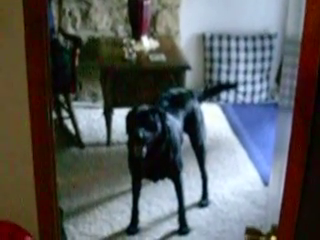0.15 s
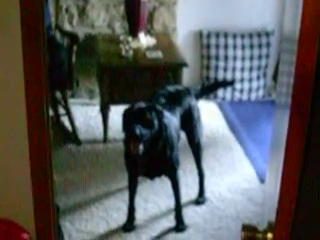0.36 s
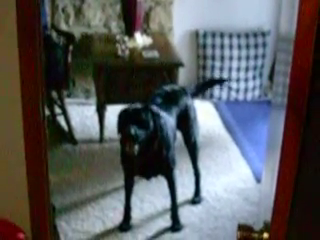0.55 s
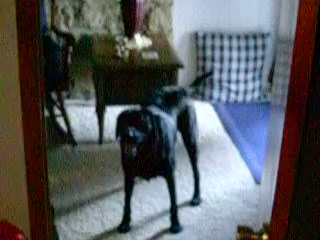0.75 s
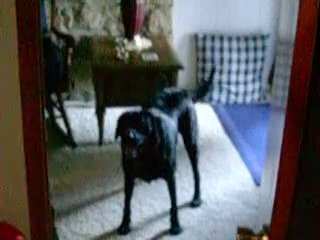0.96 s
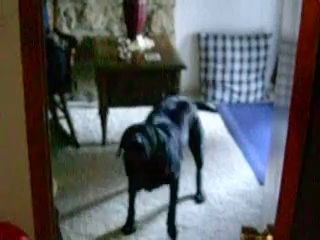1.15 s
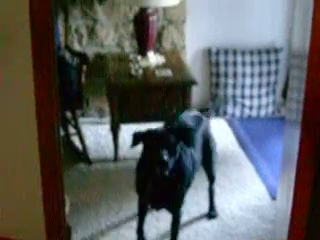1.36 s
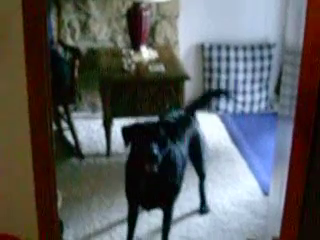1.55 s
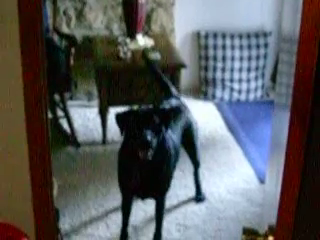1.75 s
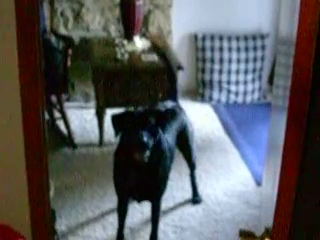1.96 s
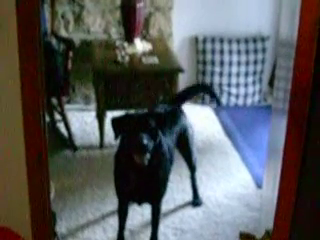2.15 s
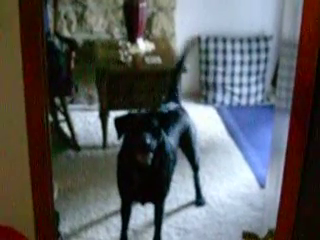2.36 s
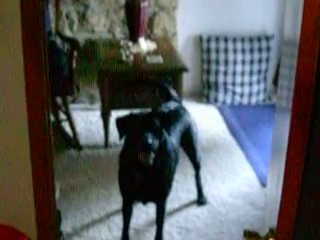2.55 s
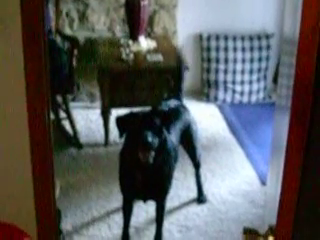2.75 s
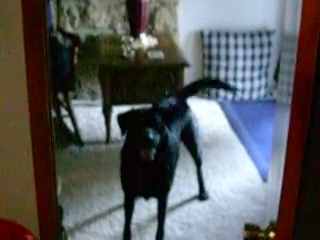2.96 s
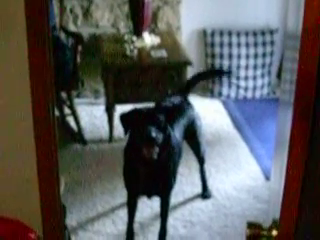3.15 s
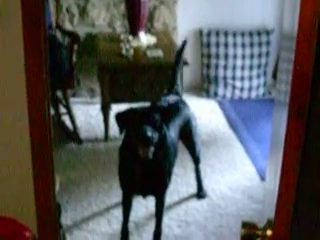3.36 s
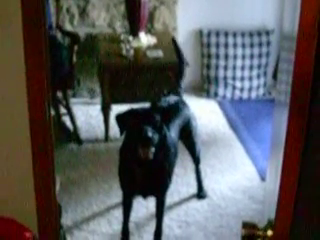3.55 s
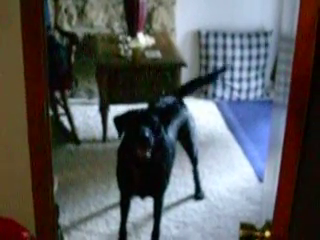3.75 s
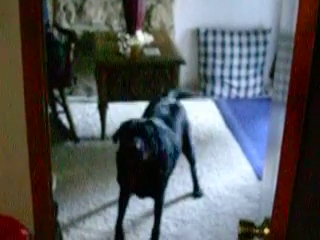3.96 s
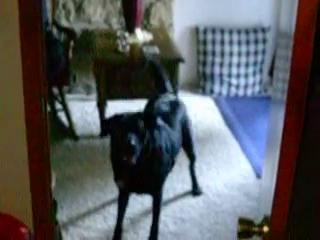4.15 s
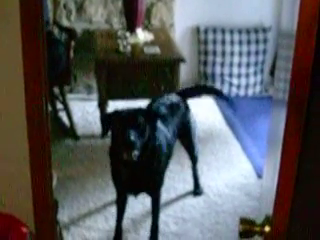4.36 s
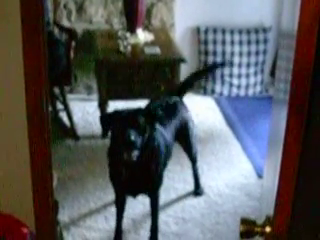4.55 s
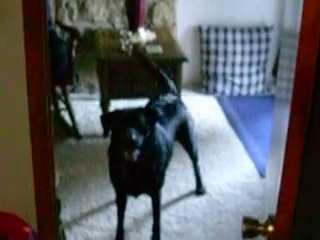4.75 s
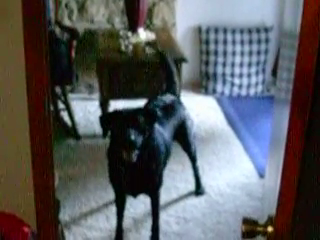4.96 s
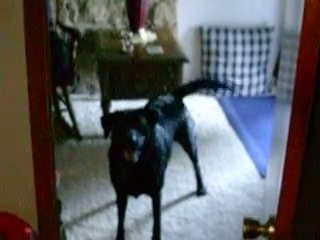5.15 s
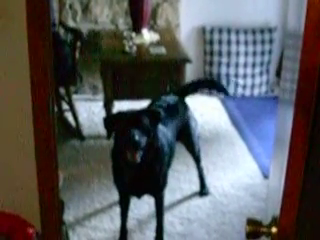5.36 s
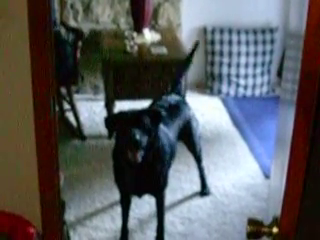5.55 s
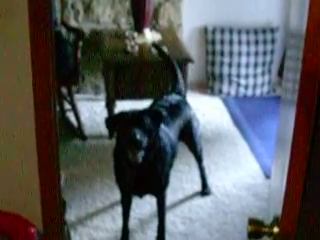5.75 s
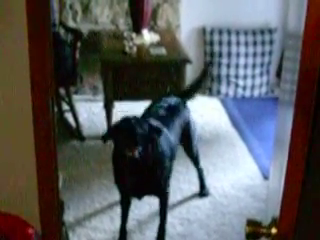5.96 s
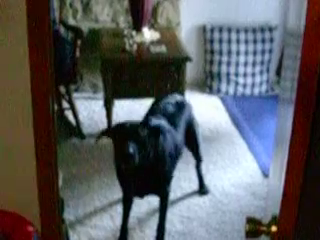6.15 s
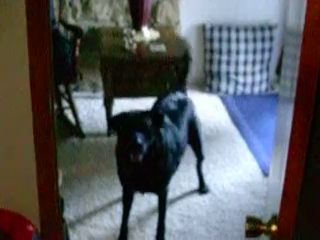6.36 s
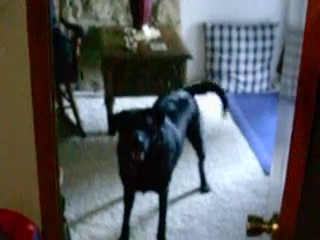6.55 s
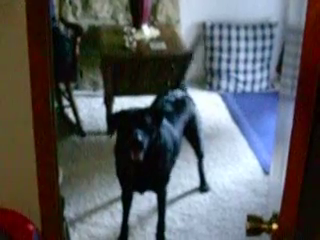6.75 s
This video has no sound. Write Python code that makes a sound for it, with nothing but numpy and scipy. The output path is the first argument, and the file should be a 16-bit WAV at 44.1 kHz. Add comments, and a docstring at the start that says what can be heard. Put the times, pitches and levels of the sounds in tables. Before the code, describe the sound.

A large dog barks three times in a carpeted living room, each bark short, hoarse and loud, with two to three seconds between them. A steady low hum runs underneath. After the first bark come a small dull knock and a bright tick, then a couple of fainter ticks and very soft huffs. The small camera microphone sounds muffled and overloads briefly as each bark starts.

```python
"""Over a low, steady hum, a large dog gives three single, hoarse barks in a carpeted living room.
Each bark is one push of air that shakes the vocal folds, swoops up in pitch and falls back.
Faint huffs, light ticks and a small double knock lie between the barks.
A small camera picks it all up: it loses the treble, overloads as each bark starts,
then turns itself down and creeps back up."""
import sys
import numpy as np
from scipy import signal
from scipy.fft import rfft, irfft
from scipy.io import wavfile
from scipy.ndimage import uniform_filter1d

SR = 44100
rng = np.random.default_rng(int(sys.argv[2]) if len(sys.argv) > 2 else 0)


def inscribe(sig):
    """Save sig as 16-bit PCM at rate SR to the path in sys.argv[1].

    A 1-D sig is mono; a 2-D sig holds one channel per row.
    Samples are clipped to [-1, 1] before scaling.
    """
    pcm = np.round(np.clip(np.atleast_2d(sig).T, -1, 1) * 32767)
    wavfile.write(sys.argv[1], SR, pcm.astype(np.int16))


N = 298865
TIME = np.arange(N) / SR

# The three barks: (start [s], attack [s], length of the push [s], pitch it climbs toward [Hz],
# level [dB], roughness [0-1], widest mouth opening [0-1], lip rustle level [dB])
BARKS = [(1.031, 0.014, 0.12, 566, -7, 0.62, 0.68, -35.5),
         (3.812, 0.0089, 0.11, 590.3, -5, 0.52, 0.89, -40.5), (5.911, 0.011, .118, 594, -5, .55, 0.88, -42)]
def dog():
    """The dog barks three times, each bark a little different."""
    out = np.zeros(N)
    for start_s, *shape, _ in BARKS:
        start = round(start_s * SR)
        sound = bark(*shape)
        out[start:start + len(sound)] += sound
    return out


def bark(attack_s, push_s, top_hz, level_db, roughness, opening,
         rest_hz=320.1, climb_s=0.036, fall_s=0.07, release_s=0.069, swell_db_per_s=23.5):
    """One push of air drives the pitch, the loudness and the mouth, then the dog lets go."""
    t = np.arange(0, push_s + release_s, 1 / SR)
    release = np.clip((t - push_s) / release_s, 0, 1)
    fall = np.clip((t - push_s + 0.006) / fall_s, 0, 1)   # pitch sags just before the push ends
    pitch = rest_hz + (top_hz - rest_hz) * (1 - np.exp(-t / climb_s)) * (1 - fall)
    # loudness leaps up, swells a little and fades in the release
    effort_db = level_db - 31.5 * np.exp(-t / attack_s) + swell_db_per_s * t - 31 * release ** 2
    # the push is unsteady, so pitch and loudness tremble together
    tremble = flutter(rate_hz=43.3, n=len(t))
    pitch *= 2 ** (0.03 * tremble)
    effort_db += 1.6 * tremble
    rough = roughness * (1 - 0.98 * release)   # the voice clears as the throat relaxes
    buzz, cycles = vocal_folds(pitch, rough)
    gape = opening * (1 - (t / t[-1]) ** 3.4)   # the mouth shuts late and fast
    voice = throat(buzz, gape)
    # even out the voice so that the effort alone sets its loudness
    voice /= np.sqrt(uniform_filter1d(voice ** 2, size=300) + 1e-12)
    # the chest booms as the pitch sweeps through its note, and fades less than the voice
    chest = resonance(np.sin(2 * np.pi * cycles), hz=350, width_hz=130)
    chest *= from_db(-9 + 19 * release ** 2)
    return (voice + chest) * from_db(effort_db)


def vocal_folds(pitch, rough, pitch_wobble=0.055, level_wobble_db=9.5):
    """Uneven flaps chop the rushing air into a hoarse buzz; also returns the running count of flaps."""
    n = len(pitch)
    cycles = np.cumsum(pitch * (1 + pitch_wobble * rough * flutter(180, n))) / SR
    pulses = np.diff(np.floor(cycles), prepend=0)
    pulses *= from_db(level_wobble_db * rough * flutter(230, n))
    air = rng.standard_normal(N)[:n] * (1 + 0.41 * np.cos(2 * np.pi * cycles))
    buzz = np.sqrt(1 - rough ** 2) * unit_power(pulses) + rough * unit_power(air)
    return cut(buzz, 2400, "low", order=1), cycles


# Where the throat and half-open mouth ring: (frequency [Hz], width [Hz], relative level [dB],
# frequency rise from shut to wide open [octaves], level rise from shut to wide open [dB])
THROAT_RINGS = [(645, 135, -1.5, 0.38, 13.5), (1050, 432, 1.5, 0.014, -2.5), (1460, 497, -1, 0.093, -9),
                (1882, 272, -7, 0.11, 6.5), (3330, 170, -28.5, 0.2, -5)]
def throat(buzz, gape):
    """Throat and mouth shape the buzz: as the mouth closes, their rings sink and "ah" turns to "oo"."""
    past_half = gape - 0.5
    voice = 0
    for k, (hz, width, db, rise_octaves, rise_db) in enumerate(THROAT_RINGS):
        ring = moving_resonance(buzz, hz * 2 ** (rise_octaves * past_half), width)
        voice += (-1) ** k * from_db(db + rise_db * past_half) * ring   # neighbours have opposite signs
    swallowed = 0.7 * resonance(voice, hz=2623, width_hz=330)   # lost in a side pocket of the throat
    return cut(voice - swallowed, 360, "high", order=3)


def lips(lead_s=0.01, length_s=0.0053):
    """A brief rustle rings in the mouth as the lips part just before each bark."""
    swell = sum(from_db(db) * bump(start_s - lead_s, length_s) for start_s, *_, db in BARKS)
    noise = cut(rng.standard_normal(N), 2400, "low", order=4)
    rustle = sum(resonance(noise, hz, width) for hz, width, *_ in THROAT_RINGS[1:4])
    return swell * unit_power(rustle)


# The dog's faint breaths between barks: (time [s], level [dB])
HUFFS = [(1.31, -45), (1.88, -56), (3.70, -53.5), (4.41, -56)]
def huffs(length_s=0.028, mouth_hz=1250, mouth_width_hz=600):
    """Soft puffs of air pass through the dog's open mouth."""
    swell = sum(from_db(db) * bump(time_s, length_s) for time_s, db in HUFFS)
    air = resonance(rng.standard_normal(N), mouth_hz, mouth_width_hz)
    return swell * unit_power(resonance(air, mouth_hz, mouth_width_hz))


# Light touches: (time [s], level [dB])
TICKS = [(1.735, -38.5), (1.752, -21), (2.505, -41), (2.980, -38.5)]
# How each tick rings: (frequency [Hz], width [Hz], relative level [dB])
TICK_RINGS = [(2940, 270, -2), (2500, 2400, -3), (2700, 40, -19), (2286, 38, -24)]
def ticks():
    """Something small, like a collar tag, is touched and rings brightly."""
    return taps(TICKS, TICK_RINGS, echo_db=-15)


# Small bumps against the camera: (time [s], level [dB])
KNOCKS = [(1.573, -38), (1.5803, -23.5)]
# How its body rings: (frequency [Hz], width [Hz], relative level [dB])
KNOCK_RINGS = [(45, 120, 3.5), (396, 350, -4), (970, 76, -7), (1640, 130, -8.5), (2700, 2100, -15)]
def knocks():
    """The camera's body is bumped twice in quick succession and gives a dull knock."""
    return taps(KNOCKS, KNOCK_RINGS, echo_db=-18)


def taps(events, rings, echo_db):
    """Each touch sets the same few notes ringing briefly, with a little room echo."""
    touches = sum(from_db(db) * signal.unit_impulse(N, round(time_s * SR)) for time_s, db in events)
    body = 0
    for hz, width, db in rings:
        ring = resonance(signal.unit_impulse(SR // 2), hz, width)
        body += from_db(db) * ring / np.abs(ring).max()
    sound = signal.oaconvolve(touches, body)[:N]
    return sound + from_db(echo_db) * echoes(sound)


# Notes the room rings at between dog and doorway: (frequency [Hz], width [Hz], relative level [dB])
ROOM_RINGS = [(460, 7.9, 12), (570, 20, -7.5), (629, 55, 7), (750, 25, -3), (1028, 72, 3), (1078, 10, 2.5),
              (1135, 27, 5), (1359, 59, 6.5), (1492, 14, 3.5), (2018, 35, 8.5), (2141, 49, 7)]
def room(x, direct_db=-5, ring_db=-6.5, echo_db=-4.5):
    """Sound arrives directly, sets the room ringing and bounces off the walls."""
    ringing = sum(from_db(db) * resonance(x, hz, width) for hz, width, db in ROOM_RINGS)
    return from_db(direct_db) * x + from_db(ring_db) * ringing + from_db(echo_db) * echoes(x)


def echoes(x, first_echo_s=0.0049, die_away_s=0.22, dull_hz=2400):
    """A blur of wall echoes, dulled by carpet and cushions, quickly dies away."""
    t = TIME[:SR // 2]
    fade = from_db(-60 * t / die_away_s)
    bounces = cut(rng.standard_normal(len(t)), dull_hz, "low", order=1) * (t > first_echo_s)
    return signal.oaconvolve(x, bounces * fade / np.linalg.norm(fade))[:N]


# The wavering tones in the hum of the house: (frequency [Hz], rough width [Hz], level [dB])
HUM_TONES = [(90.7, 15.2, -44), (117, 17.4, -51), (217.4, 13.5, -55.5), (395, 22, -58.5)]
# How strong the rumble under them is, from bass to treble: (frequency [Hz], relative level [dB])
RUMBLE_SHAPE = [(12, -51), (20, 3), (102, -1.5), (129, -0.5), (172, -12), (219, -7.5), (285, -17),
                (405, -19.5), (563, -23.5), (628, -17.5), (686, -24.5), (817, -21.5), (3800, -46.5),
                (4940, -71), (8360, -120)]
def hum(rumble_db=-40):
    """A low rumble carries a few wavering tones, like a fan or furnace."""
    shape_hz, shape_db = np.transpose(RUMBLE_SHAPE)
    frequencies = np.fft.rfftfreq(N, 1 / SR)
    colour = from_db(np.interp(np.log(frequencies + 1), np.log(shape_hz), shape_db))
    rumble = irfft(rfft(rng.standard_normal(N)) * colour, N)
    out = from_db(rumble_db) * unit_power(rumble)
    for hz, width, db in HUM_TONES:
        tone = resonance(rng.standard_normal(N), hz, 2 * width)
        out += from_db(db) * unit_power(resonance(tone, hz, 2 * width))
    return out


def from_db(db):
    """Turn decibels into a number to multiply by."""
    return 10 ** (np.asarray(db) / 20)


def unit_power(x):
    """Scale a sound to an average power of 1."""
    return x / np.sqrt(np.mean(x ** 2) + 1e-20)


def cut(x, hz, keep, order=2):
    """Keep the "low" or "high" side of a frequency; a higher order cuts more sharply."""
    return signal.sosfilt(signal.butter(order, hz, keep, fs=SR, output="sos"), x + 1e-18)


def resonance(x, hz, width_hz):
    """Ring at one frequency; the narrower the width, the longer the ring."""
    r = np.exp(-np.pi * width_hz / SR)
    feedback = [1, -2 * r * np.cos(2 * np.pi * hz / SR), r * r]
    return signal.lfilter(np.array([1, 0, -1]) * (1 - r * r) / 2, feedback, x + 1e-18)


def moving_resonance(x, hz, width_hz):
    """Ring at a frequency that slides over time."""
    r = np.exp(-np.pi * width_hz / SR)
    turn = np.exp(2j * np.pi * np.cumsum(hz) / SR)
    return 2 * np.real(turn * signal.lfilter([1 - r], [1, -r], x / turn))


def flutter(rate_hz, n):
    """Up to a second of random wavering, mostly slower than the given rate."""
    return unit_power(cut(rng.standard_normal(SR)[:n], rate_hz, "low"))


def bump(time_s, length_s):
    """A smooth rise and fall around one moment."""
    return np.exp(-0.5 * ((TIME - time_s) / length_s) ** 2)


def scene():
    """The dog in its room, the small ticks and knocks, and the hum, in one channel."""
    small_sounds = ticks() + knocks()
    return (room(dog() + lips() + huffs()) + small_sounds + hum())[None]


def auto_volume(x, threshold_db=-17, strength=0.86, delay_s=0.019, attack_s=0.013, recover_db_per_s=45):
    """Loud sound turns the volume down, too late for the start of a bark; it then creeps back."""
    level_db = 10 * np.log10(np.maximum(uniform_filter1d(x ** 2, size=400), 1e-12))
    dip_db = strength * np.maximum(level_db - threshold_db, 0)
    recovery_db = recover_db_per_s * TIME
    held_db = np.maximum.accumulate(dip_db + recovery_db) - recovery_db
    late_db = np.interp(TIME - delay_s, TIME, held_db)
    r = np.exp(-1 / (attack_s * SR))
    return x * from_db(-signal.lfilter([1 - r], [1, -r], late_db))


def record(dry, treble_edge_hz=3870, camera_rate_hz=8000, hiss_db=-56, input_limit=0.73, tip_limit=0.75):
    """The camera rides the volume, loses treble like a telephone, flattens loud peaks and adds hiss."""
    band = signal.butter(22, treble_edge_hz, fs=SR, output="sos")
    hiss = from_db(hiss_db) * unit_power(signal.sosfilt(band, rng.standard_normal(N)))
    muffled = signal.sosfilt(band, auto_volume(dry[0]))
    # overloading at the camera's low sample rate folds the distortion back under 4 kHz as a rasp
    positions = np.arange(0, N + SR / 100, SR / camera_rate_hz)
    overloaded = np.clip(np.interp(positions, np.arange(N), muffled), -input_limit, input_limit)
    up = SR // np.gcd(SR, camera_rate_hz)
    smoothing = signal.firwin(48 * up + 1, 1 / up, window=("kaiser", 9))
    sound = signal.resample_poly(overloaded, SR, camera_rate_hz, window=smoothing)[:N]
    # the smoothed waves overshoot, and those tips are cut once more
    sound = np.clip(sound + hiss, -tip_limit, tip_limit)
    top_cut = signal.cheby2(12, 70, 16500, fs=SR, output="sos")   # nothing left above 16.5 kHz
    return signal.sosfilt(top_cut, sound)[None]


dry = scene()
out = record(dry)
inscribe(out)
```